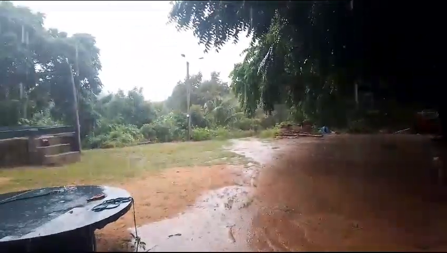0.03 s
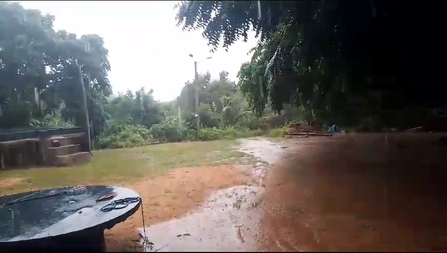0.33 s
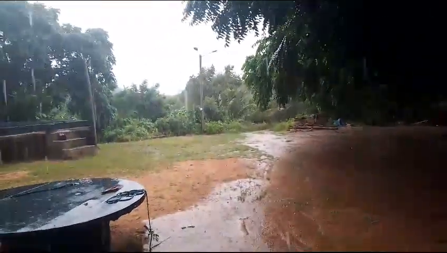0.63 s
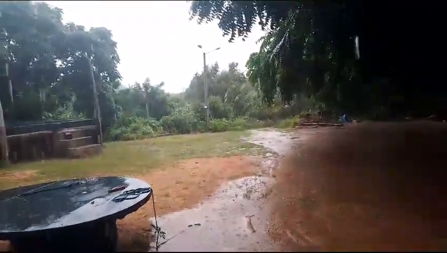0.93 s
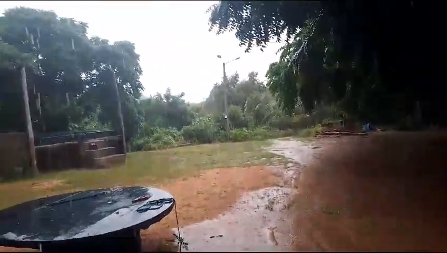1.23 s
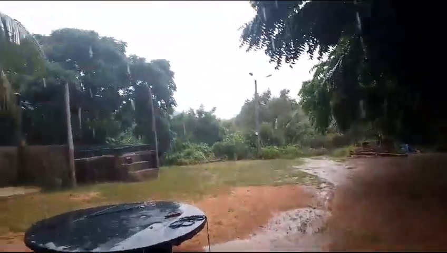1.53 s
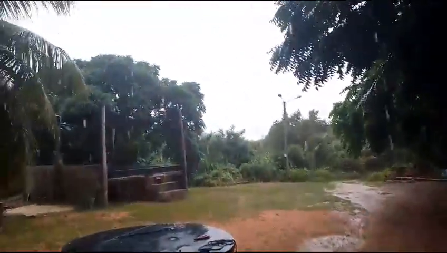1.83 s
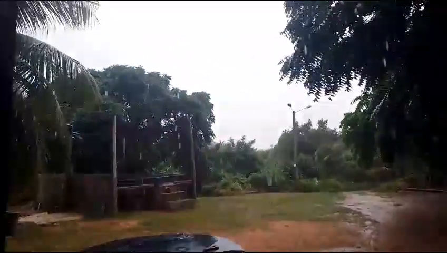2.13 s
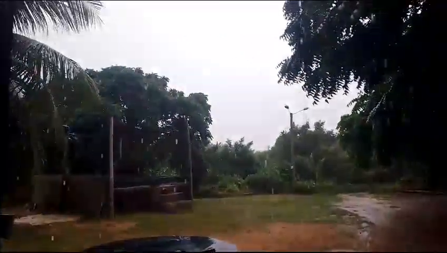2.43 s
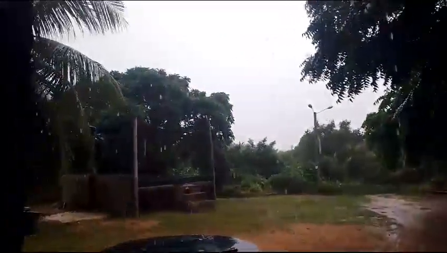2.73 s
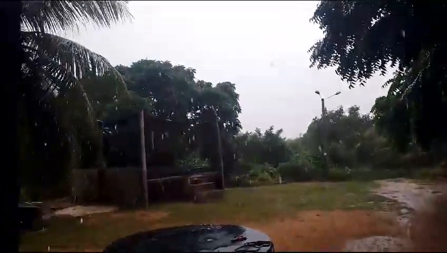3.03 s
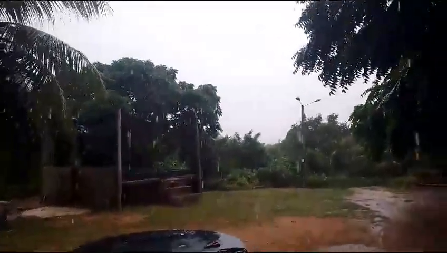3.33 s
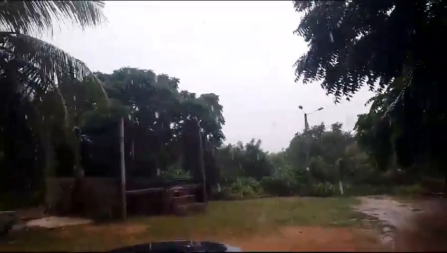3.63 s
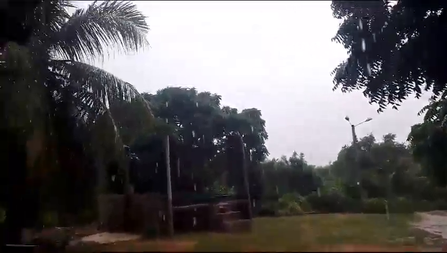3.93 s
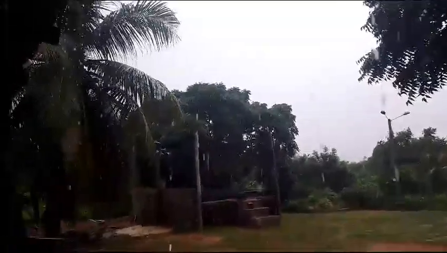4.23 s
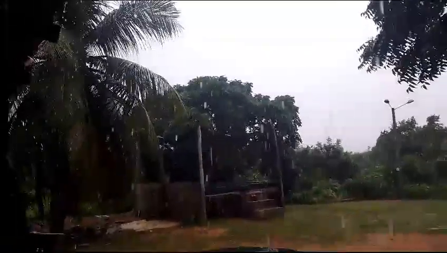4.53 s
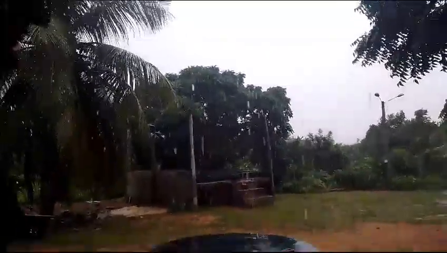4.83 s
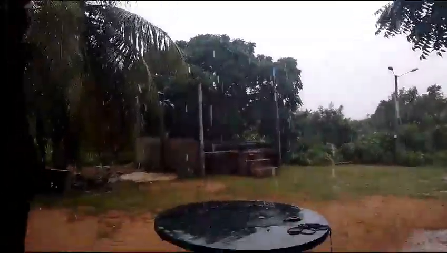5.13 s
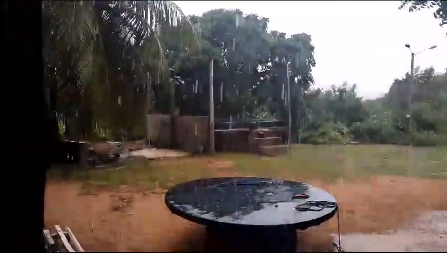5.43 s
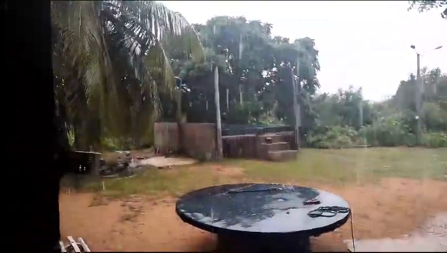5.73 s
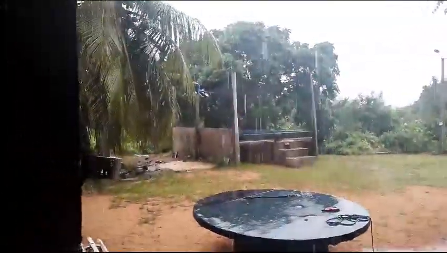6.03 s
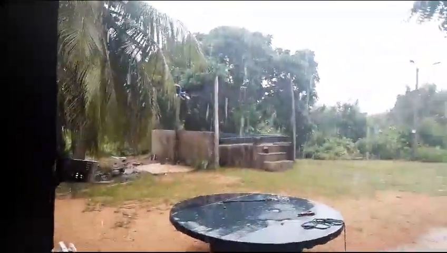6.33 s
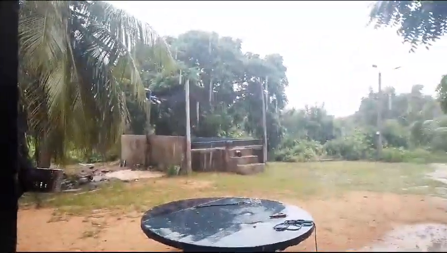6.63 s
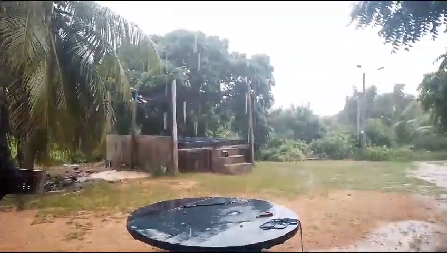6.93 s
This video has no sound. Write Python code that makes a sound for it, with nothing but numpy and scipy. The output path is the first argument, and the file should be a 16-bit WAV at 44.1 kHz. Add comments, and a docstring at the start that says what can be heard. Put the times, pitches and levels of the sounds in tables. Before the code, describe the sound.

Heavy rain falls on a yard, heard from a microphone at the edge of a shelter. A thin, bright sizzle runs throughout, with drops pattering on leaves and mud and a dull wash of rain farther off. Fat drops snap close by and run-off splats irregularly on the wet ground. Just under a second in, wind starts buffeting the microphone with a hollow low rumble that swells and dips.

```python
"""Heavy rain on a yard

A phone's microphone at the edge of a shelter, facing leaves and puddles. Countless drops sizzle, fat ones
snap close by and run-off splats on the wet ground. Wind rushes over the phone; far rain washes behind.
The treble is thin and peaked, lower on the left than on the right; its two peaks broaden and narrow."""
import sys
import numpy as np
from scipy import signal
from scipy.fft import rfft, irfft, next_fast_len
from scipy.io import wavfile
from scipy.ndimage import uniform_filter1d

SR = 44100
rng = np.random.default_rng(int(sys.argv[2]) if len(sys.argv) > 2 else 0)


def store_wav(level_fs):
    """Save 16-bit WAV to argv[1]."""
    pcm = np.round(np.clip(np.atleast_2d(level_fs), -1, 1) * 32767)
    wavfile.write(sys.argv[1], SR, pcm.T.astype(np.int16))


N = 316197
T = np.arange(N) / SR

# colour of the far rain: (frequency [Hz], gain [dB])
FAR_RAIN_COLOUR = [(25, -8), (75, 1.5), (170, -14), (260, -21), (380, 7), (520, 3), (900, 3.5), (1300, 1.5),
                   (1900, 2.5), (2500, -13), (3500, -2.5), (6000, -1.5), (13500, -11), (15000, -40)]
# a faint steady hum far off: (frequency [Hz], level [dB])
FAR_HUM = [(651, -73), (1954, -75)]
# faint far tones: (time [s], length [s], frequency [Hz], level [dB], width [Hz])
FAR_TONES = [(0.052, 0.22, 374, -58, 30), (0.23, 0.2, 866, -59.5, 35), (0.57, 0.26, 860, -62, 30),
             (0.9, 0.32, 862, -52.5, 30), (2.285, 0.065, 824, -52, 25), (3.957, 0.11, 824, -54, 30),
             (4.03, 0.27, 4220, -56, 280), (5.3, 0.35, 1733, -63, 35), (5.49, 0.3, 870, -61.5, 30)]

# colours of the wind's low thud, hollow rumble and upper rush: (frequency [Hz], gain [dB])
THUD_COLOUR = [(25, -28), (42, -21), (60, -2.5), (69, -24), (75, 10), (86, -2), (100, 5), (112, 13.5),
               (122, 0), (137, 7.5), (160, -7), (200, -53)]
RUMBLE_COLOUR = [(140, -27), (165, -24), (195, 2), (250, 1), (310, -1.5), (380, 3), (470, -8.5),
                 (620, -31.5), (1000, -49), (4000, -74)]
RUSH_COLOUR = [(170, -18), (200, -16), (330, 2), (480, 4), (660, 0.5), (850, -7.5), (1100, -6), (1600, -20),
               (6000, -70)]
# wind on the microphone, its thud and its rumble: (time [s], level [dB])
THUD_DB = [(0.0, -55), (0.12, -75), (0.62, -83), (0.72, -53), (0.98, -44.5), (1.42, -58.5), (1.7, -57),
           (1.98, -50.5), (2.14, -51.5), (2.35, -60), (3.22, -55), (3.31, -64), (3.49, -55), (3.6, -51),
           (3.8, -52), (3.95, -51), (4.25, -60.5), (4.65, -61), (4.99, -48), (5.25, -57), (5.57, -61),
           (5.85, -59), (6.23, -53), (6.63, -71), (6.75, -52.5), (6.93, -60), (7.17, -56)]
RUMBLE_DB = [(0.0, -56), (0.1, -60.5), (0.38, -73), (0.64, -66), (0.72, -41), (1.02, -34.5), (1.44, -43),
             (1.94, -38.5), (1.96, -36), (2.37, -43), (2.46, -37.5), (2.5, -44), (2.79, -36.5),
             (2.85, -41.5), (3.09, -37.5), (3.39, -47), (3.57, -35.5), (3.72, -38), (3.86, -36.5),
             (4.03, -40.5), (4.59, -46.5), (4.71, -41.5), (4.83, -44), (4.97, -38), (5.45, -47),
             (5.47, -41), (5.71, -56), (5.75, -45.5), (6.03, -47), (6.12, -42), (6.31, -44), (6.61, -59),
             (6.75, -40.5), (6.97, -47), (7.17, -40)]
# centre of the hollow rumble: (time [s], frequency [Hz])
RUMBLE_CENTRE = [(0.7, 298), (2.9, 313), (3.6, 278), (4.15, 310), (4.8, 288), (6.3, 267.6), (7.17, 284)]
# drive of the upper rush, which comes with the strong gusts: (time [s], relative level [dB])
RUSH_DRIVE = [(0.0, -59.5), (0.68, -60.5), (0.84, -48), (1.0, -45), (1.12, -45), (1.45, -51.5), (1.62, -49),
              (1.82, -54), (2.02, -48.5), (2.27, -50.5), (2.44, -59), (2.66, -57), (2.74, -55), (2.98, -56),
              (3.1, -54), (3.25, -61), (3.48, -60), (3.6, -48.5), (3.7, -47), (3.9, -45.5), (4.0, -50),
              (4.16, -53), (4.9, -59), (4.99, -51), (5.19, -54), (5.35, -56.5), (6.35, -60.5), (7.0, -53.5),
              (7.17, -52.5)]

# run-off landing in the yard: (time [s], relative smack level [dB], droplet wash level [dB],
# centre [Hz], band spread [ratio], wash decay [s], left minus right [dB])
RUNOFF_SPLATS = [(0.114, -48, -50, 3170, 1.5, .06, 0), (0.27, -45, -46, 3340, 1.17, .07, 2),
                 (0.531, -36, -45.5, 3580, 1.4, 0.039, 2), (0.741, -34.5, -52, 2800, 1.2, 0.026, 4),
                 (0.764, -42, -44, 4400, 0.84, .025, 3), (0.896, -46, -53, 3900, 1.15, .012, 0),
                 (1.11, -43, -43, 3100, 1.46, 0.027, 1.5), (1.158, -47, -47.5, 3100, 1.34, 0.044, -1),
                 (2.294, -31, -43, 3370, 1.18, 0.025, 1), (2.499, -39, -46, 4700, 1.1, .015, 3),
                 (2.524, -44, -42, 5100, 1.08, .03, 14), (3.0902, -45, -46.5, 2470, 1.43, 0.028, 1),
                 (3.487, -38, -41, 3680, 1.5, 0.013, 0), (3.864, -38, -42.5, 3600, 1.1, 0.028, 4),
                 (4.025, -43, -48.5, 2960, 1.1, .012, 4), (4.434, -40, -44, 3400, 1.7, .012, 0),
                 (4.451, -30.5, -45.5, 3380, 1.14, .038, 2), (4.483, -41, -45, 4230, 1.35, 0.028, -3),
                 (4.8057, -34, -45.5, 3470, 1.4, .033, 4), (5.2, -38, -51, 3020, 1.4, .02, 2),
                 (5.402, -41, -42.5, 3400, 1.2, 0.016, -4), (5.652, -38, -53, 2700, 1.7, .008, 2),
                 (5.658, -29, -38.5, 4300, 1.16, .011, 3), (5.889, -41, -49, 1990, 1.1, .022, 1),
                 (6.508, -38, -45.5, 4460, 1.18, .035, 3), (6.617, -40, -44, 4540, 1.2, 0.025, 0),
                 (6.7688, -51, -45.5, 4200, 1.24, 0.024, 0), (6.876, -45, -49, 3800, 1.4, .03, -3)]
# fat drops close to the microphone, levels before filtering:
# (time [s], left tick [dB], right tick [dB], snap [dB], snap decay [s])
CLOSE_DROPS = [(0.1489, -5, -12, -24, .0008), (0.2146, -15, -17, -38, .0008),
               (0.2694, -11, -20, -39, .0004), (0.281, -10, -17, -41, .0004), (0.4845, -7, -21, -33, .0004),
               (0.531, -12, -21, -42, .0004), (1.148, -15, -20, -37, .0008), (1.1605, -5, -19, -37, .0004),
               (1.7284, -12, -17, -35, .0004), (1.8815, -14, -19, -29, .0006), (1.915, -14, -17, -29, .001),
               (2.0196, -16, -19, -22, .002), (2.1437, -13, -21, -40, .001), (2.2945, -13, -24, -44, .0004),
               (2.6372, -13, -19, -42, .0004), (2.7359, -15, -7, -37, .0004), (3.0569, -3, -19, -35, .0004),
               (3.091, -13, -20, -42, .0004), (3.2063, -6, -23, -33, .0004), (3.405, -19, -17, -34, .0008),
               (3.8031, -4, -11, -25, .0008), (4.1324, -22, -15, -36, .0004), (4.2951, -7, -14, -33, .0004),
               (4.4516, -8, -10, -24, .0008), (4.5808, -16, -17, -31, .002), (4.6312, -16, -9, -15, .002),
               (4.644, -19, -9, -19, .002), (4.8063, -12, -19, -38, .0004), (5.2176, -6, -22, -39, .0004),
               (5.3523, -14, -5, -20, .001), (5.4024, -13, -16, -37, .0006), (5.4144, -8, -13, -36, .0004),
               (5.5446, -7, -13, -28, .0006), (5.652, -0.3, -21, -31, .0004),
               (5.6586, -18, -13, -39, .0004), (5.669, -13, -18, -40, .001), (6.3593, -12, -22, -36, .0004),
               (6.7035, -20, -13, -29, .0008), (6.7198, -20, -12, -33, .0004)]
# colour of the rain beneath its treble peaks: (frequency [Hz], left gain [dB], right gain [dB])
YARD_RAIN_COLOUR = [(1000, -34, -62), (2170, -26.5, -27), (3980, -26, -24), (5160, -17.5, -20.5),
                    (8600, -29, -17), (9350, -19, -28), (11300, -23, -9.5), (14300, -20, -25)]
# edges of the sizzle, set wider at the strong gusts:
# (time [s], left low [Hz], left high [Hz], right low [Hz], right high [Hz])
SIZZLE_EDGES = [(0.0, 5550, 8650, 8650, 12200), (0.25, 5100, 8700, 8300, 12500),
                (0.55, 6030, 8400, 9000, 11700), (0.85, 4500, 9100, 8200, 12500),
                (1.2, 4600, 9500, 7450, 12700), (1.85, 4640, 9900, 7500, 13200),
                (2.02, 4630, 10600, 7300, 14200), (2.2, 4650, 10200, 7640, 13600),
                (2.44, 5000, 8300, 9100, 11700), (2.75, 5520, 8450, 8850, 11640),
                (3.45, 5700, 8500, 9330, 11230), (3.88, 5140, 10100, 7200, 13200),
                (4.1, 4670, 9750, 7600, 13600), (4.28, 5600, 8260, 8100, 12250),
                (4.62, 5700, 8340, 8600, 12400), (4.92, 5860, 8400, 8900, 12400),
                (5.24, 5580, 8150, 8500, 11800), (5.47, 5860, 9100, 7500, 12650),
                (6.1, 5700, 8300, 8250, 12600), (6.43, 6580, 7940, 8800, 12000),
                (6.76, 4830, 9100, 8100, 13100), (7.17, 4740, 8950, 8060, 11950)]


def undb(db):
    """Decibels to gain."""
    return 10 ** (np.asarray(db) / 20)


def unit(x):
    """Scale to rms 1."""
    return x / np.sqrt(np.mean(x ** 2))


def steady(x):
    """Hold a noise near rms 1 over each eighth of a second, keeping its quick roughness."""
    return x / np.sqrt(uniform_filter1d(np.mean(x ** 2, axis=0), size=SR // 8))


def curves(table):
    """Each column of a table, joined by straight lines in time."""
    s, *columns = np.transpose(table)
    return [np.interp(T, s, c) for c in columns]


def gain_at(hz, colour, column=1):
    """Gain read from one dB column of a colour table, on a log-frequency axis."""
    colour = np.array(colour, float)
    return undb(np.interp(np.log(hz + 1), np.log(colour[:, 0]), colour[:, column]))


def bell(hz, centre_hz, width_hz, steepness=2):
    """A bell-shaped resonance, as power."""
    return np.exp(-np.abs((hz - centre_hz) / width_hz) ** steepness / 2)


def soft_edge(above_hz, softness_hz=290):
    """A band edge, rising from 0 to 1."""
    return (1 + np.tanh(above_hz / softness_hz)) / 2


def noise(colour, shared):
    """Coloured stereo noise; shared is the fraction of power common to both sides."""
    size = next_fast_len(N)
    white = rng.standard_normal((3, size))
    pair = np.sqrt(shared) * white[0] + np.sqrt(1 - shared) * white[1:]
    spectrum = rfft(pair) * gain_at(np.fft.rfftfreq(size, 1 / SR), colour)
    return unit(irfft(spectrum, size)[:, :N])


def wander(rate_hz):
    """Smooth random wandering at rms 1."""
    knots = rng.standard_normal(4096)
    return unit(np.interp(T * rate_hz, np.arange(len(knots)), knots))


def pan(left_minus_right_db):
    """Left and right gains that place a sound to one side."""
    return undb(np.array([[left_minus_right_db], [-left_minus_right_db]]) / 2)


def add(out, s, sound):
    """Mix a stereo sound in at time s."""
    start = max(int(s * SR), 0)
    part = sound[:, :max(N - start, 0)]
    out[:, start:start + part.shape[1]] += part


def blurred_tone(hz, width_hz):
    """A tone smeared by distance into a narrow band, different on each side."""
    carrier = np.exp(2j * np.pi * hz * T)
    sides = [(wander(width_hz) + 1j * wander(width_hz)) * carrier for _ in range(2)]
    return unit(np.real(sides))


def far_background(rain_db=-54):
    """Far from the shelter: a dull wash of rain, with a faint hum and a few blurred tones in it."""
    out = noise(FAR_RAIN_COLOUR, shared=0.0087) * undb(rain_db)
    for hz, db in FAR_HUM:
        out += undb(db) * blurred_tone(hz, width_hz=7)
    for s, length_s, hz, db, width_hz in FAR_TONES:
        swell = np.sin(np.pi * np.clip((T - s) / length_s, 0, 1))
        out += undb(db) * swell * blurred_tone(hz, width_hz)
    return out


def wind_rumble(width_hz=24, drift_hz=5, median_flank_db=-12):
    """Wind on the phone sounds a hollow, drifting resonance; harder gusts spill further beyond it."""
    level_db, = curves(RUMBLE_DB)
    gust_db = level_db - np.median(level_db)
    hz, s, spectrum = signal.stft(noise(RUMBLE_COLOUR, shared=.86), SR, nperseg=2048)
    centre_hz = np.interp(s, T, curves(RUMBLE_CENTRE)[0] + drift_hz * wander(3.4))
    flank_db = median_flank_db + np.interp(s, T, gust_db)
    resonance = np.sqrt(bell(hz[:, None], centre_hz, width_hz) + undb(flank_db) ** 2)
    return steady(signal.istft(spectrum * resonance, SR)[1][:, :N]) * undb(level_db)


def wind_rush(calm_db=-60.5, strong_db=-46, strong_corner_hz=900, db_per_octave=14, boost_db=5):
    """The wind's upper rush, silent in a calm, reaches higher in pitch the harder it blows."""
    drive_db, = curves(RUSH_DRIVE)
    hz, s, spectrum = signal.stft(noise(RUSH_COLOUR, shared=0.41), SR, nperseg=1024)
    corner_hz = strong_corner_hz * 2 ** ((np.interp(s, T, drive_db) - strong_db) / db_per_octave)
    roll_off = 1 / np.sqrt(1 + (hz[:, None] / corner_hz) ** 8)
    rush = steady(signal.istft(spectrum * roll_off, SR)[1][:, :N])
    return rush * np.maximum(undb(drive_db) - undb(calm_db), 0) * undb(boost_db)


def wind(buffet_db=2.2, flutter_db=1.6):
    """Gusts right on the microphone: a hollow rumble, a fluttering low thud and a buffeting rush."""
    rumble = wind_rumble()
    thud = noise(THUD_COLOUR, shared=0.91) * undb(curves(THUD_DB)[0])
    rush = wind_rush() * undb(buffet_db * wander(45))
    return rumble + thud * undb(flutter_db * wander(25)) + rush


def plink(hz, cycles, rise=.022):
    """A droplet's bubble: it fades to 1/e over some cycles as its pitch climbs by the fraction rise."""
    age = T[:1536] * hz / cycles
    return np.sin(2 * np.pi * cycles * age * (1 + rise * age / 2)) * np.exp(-age)


def leaves(level_db=-56, low_hz=1700, high_hz=5200, drops=900, droplets=6, shed_s=.03, flurry_db=2.2):
    """Across the yard, drops burst on wet leaves and mud in flurries, shedding droplets close in pitch."""
    out = np.zeros((2, N))
    for when, pitch, chance, side in rng.random((drops, 4)):
        hz = low_hz * (high_hz / low_hz) ** pitch
        size_db = min(-2 * np.log(1 - chance), 5)  # many small, a few large
        placement = np.array([[np.cos(np.pi * side)], [np.sin(np.pi * side)]])
        gain = placement * undb(size_db) * hz / low_hz
        for late, detune in rng.random((droplets, 2)):
            droplet = plink(hz * (1 + .11 * (2 * detune - 1)), cycles=8)
            add(out, when * N / SR + late * shed_s, gain * np.exp(-late) * droplet)
    return undb(level_db) * unit(out * undb(flurry_db * wander(9)))


def impacts(per_s, scatter_db, limit_db, size=N):
    """Random impacts on each side: many small and distant, a few large and near."""
    hit = rng.random((2, size)) < per_s / SR
    strength = undb(np.minimum(scatter_db * rng.exponential(size=(2, size)), limit_db))
    return hit * strength * rng.choice([-1, 1], (2, size))


def runoff(smack_s=.0017, ring_s=.0012, lead_s=.005, trim_db=-1, ring_db=-3, bubble_db=2, bubbles=5):
    """Slugs of run-off smack the wet ground with a brief ring, then scatter droplets and a few bubbles."""
    out = np.zeros((2, N))
    t = T[:12288] - T[1024]  # zero at the impact
    for s, smack_db, wash_db, hz, spread, decay_s, pan_db in RUNOFF_SPLATS:
        spread = np.clip(spread, 1.05, 2)
        band = signal.butter(2, [hz / spread, hz * spread], "band", fs=SR, output="sos")
        droplets = unit(signal.sosfilt(band, impacts(per_s=1500, scatter_db=3, limit_db=9, size=len(t))))
        wash = droplets * np.exp(-np.maximum(t / decay_s, -t / lead_s)) * undb(wash_db)
        ring = np.sin(2 * np.pi * hz * t) * np.exp(-np.abs(t) / ring_s) * undb(ring_db)
        smack = unit(signal.sosfilt(band, rng.standard_normal((2, len(t))))) * np.exp(-np.abs(t) / smack_s)
        hit = (t > 0) * (ring + smack) * undb(smack_db + trim_db)
        add(out, s + t[0], pan(pan_db) * (wash + hit))
        for late, pitch in rng.random((bubbles, 2)):
            bubble = plink(hz * spread ** (2 * pitch - 1), cycles=12) * undb(wash_db + bubble_db)
            add(out, s + 2 * late * decay_s, pan(pan_db) * bubble * np.exp(-2 * late))
    return out


def snaps(trim_db=-1, band_hz=(7000, 14000)):
    """Close to the microphone, the skin of each fat drop bursts with a short, bright snap."""
    out, t = np.zeros((2, N)), T[:1024]
    for s, left_db, right_db, snap_db, decay_s in CLOSE_DROPS:
        burst = np.exp(-t / decay_s) * rng.standard_normal((2, len(t)))
        add(out, s, burst * undb(snap_db + trim_db) * pan(0.19 * (left_db - right_db)))
    return signal.sosfilt(signal.butter(4, band_hz, "band", fs=SR, output="sos"), out)


def fat_drops(boost_db=17.2, shower_db=-24, shower_s=.012, low_cut_hz=4000):
    """Each fat drop lands close by as one sharp tick followed by a dying shower of droplets."""
    out, t = np.zeros((2, N)), T[:4096]
    for s, left_db, right_db, _, _ in CLOSE_DROPS:
        hardness_db = .7 * (max(left_db, right_db) + 11)  # the hardest drops are nearly all tick
        drop = undb(shower_db - hardness_db) * rng.standard_normal(len(t)) * np.exp(-t / shower_s)
        drop[0] = 1  # the tick
        add(out, s, drop * undb(np.array([[left_db], [right_db]]) + boost_db))
    return signal.sosfilt(signal.butter(2, low_cut_hz, "high", fs=SR, output="sos"), out)


def patter(splash_db=-2, splash_s=.005, hiss_db=-3):
    """Drops all over the yard tick and throw a brief splash; far ones merge into a hiss."""
    ticks = unit(impacts(per_s=2600, scatter_db=4.2, limit_db=16.5))
    decay = np.exp(-T[:2048] / splash_s)
    envelope = signal.fftconvolve(ticks ** 2, decay[None], axes=1)[:, :N]
    splash = unit(envelope * rng.standard_normal((2, N)))
    hiss = rng.standard_normal((2, N))
    flicker_db = 0.87 * wander(18) + 0.42 * wander(70)
    return unit(ticks + undb(splash_db) * splash + undb(hiss_db) * hiss) * undb(flicker_db)


def sizzle(x, edges_hz, column, centre_hz, width_hz, steepness, peak_db, fizz_db, top_hz=14350):
    """One side's rain colour: a treble peak between moving edges, with a thin fizz on top when wide."""
    hz, s, spectrum = signal.stft(x, SR, nperseg=512)
    hz = hz[:, None]
    low_hz, high_hz = (np.interp(s, T, edge) for edge in edges_hz)
    opening = (high_hz - low_hz) / np.median(high_hz - low_hz)
    window = soft_edge(hz - low_hz) * soft_edge(high_hz - hz)
    peak = (undb(peak_db) * window) ** 2 * bell(hz, centre_hz, width_hz, steepness)
    fizz = undb(fizz_db) ** 2 * bell(hz, centre_hz=13300, width_hz=300, steepness=1) * opening ** 4.7
    power = peak + fizz + gain_at(hz, YARD_RAIN_COLOUR, column) ** 2
    return signal.istft(spectrum * np.sqrt(power) * (hz < top_hz), SR)[1][:N]


def rain(patter_db=-20.5, ease_db_per_s=0.2847):
    """Just beyond the shelter: slowly easing patter and fat drops, sizzling lower in pitch on the left."""
    edges_hz = curves(SIZZLE_EDGES)
    left, right = patter() * undb(patter_db - ease_db_per_s * T) + fat_drops()
    left = sizzle(left, edges_hz[:2], column=1, centre_hz=6994, width_hz=448,
                  steepness=1.176, peak_db=4, fizz_db=-21.5)
    right = sizzle(right, edges_hz[2:], column=2, centre_hz=10414, width_hz=580,
                   steepness=1.21, peak_db=3, fizz_db=-25)
    return np.array([left, right])


def scene():
    """From the shelter's edge: rain, run-off, leaves and wind over the far background."""
    return rain() + snaps() + runoff() + leaves() + wind() + far_background()


def record(dry):
    """The phone cuts the top steeply above 15.7 kHz."""
    return signal.sosfilt(signal.ellip(10, .2, 80, 15700, fs=SR, output="sos"), dry)


dry = scene()
out = record(dry)
store_wav(out)
```